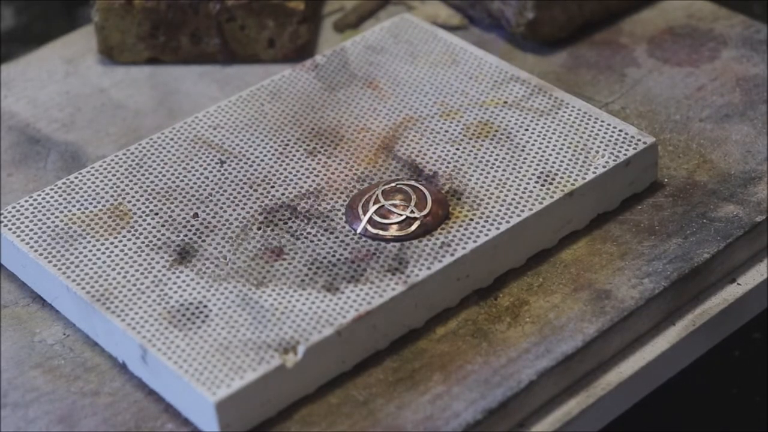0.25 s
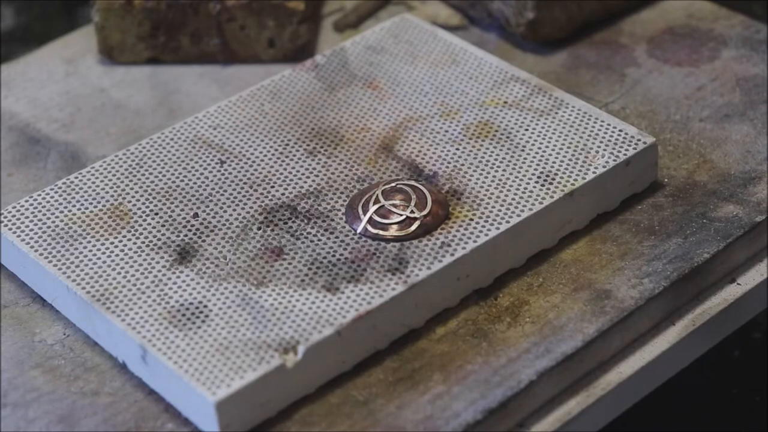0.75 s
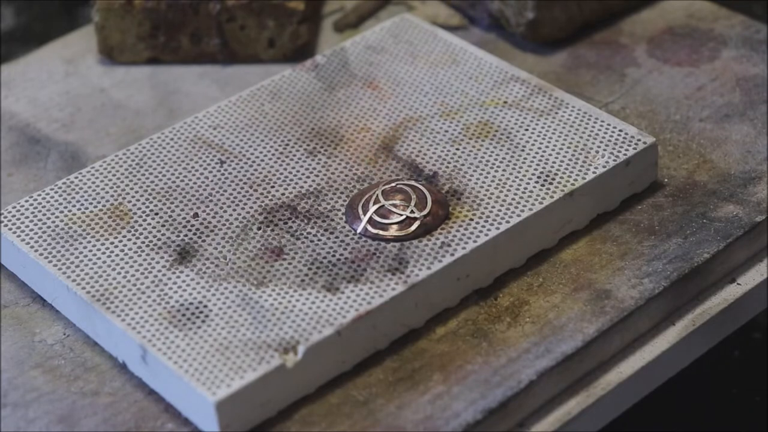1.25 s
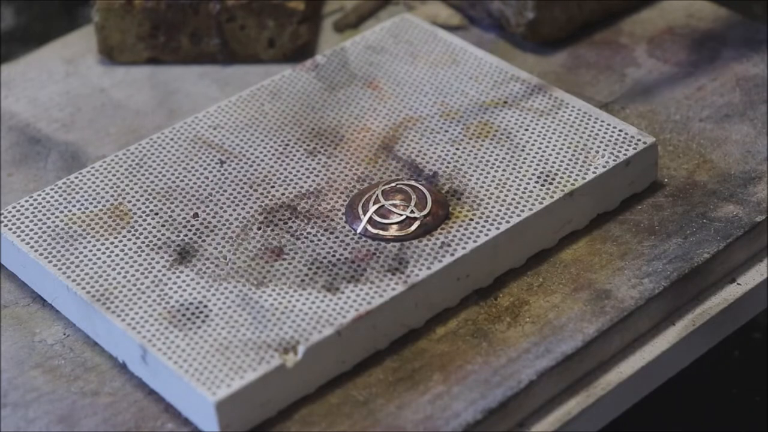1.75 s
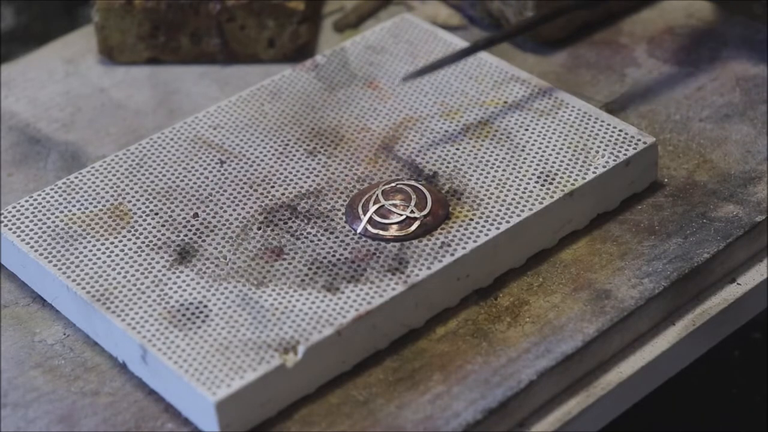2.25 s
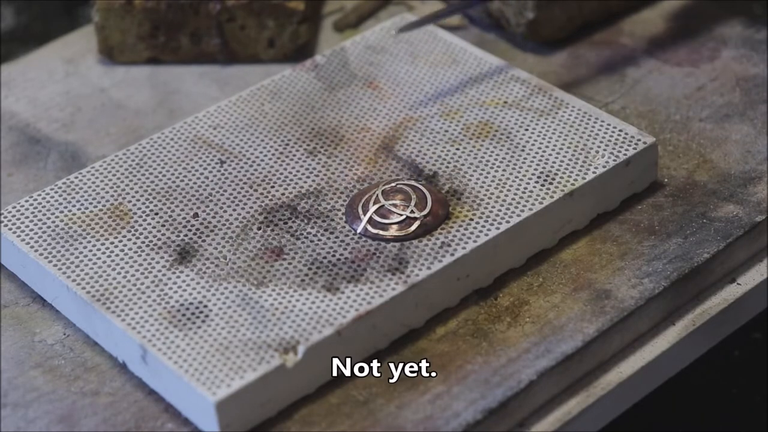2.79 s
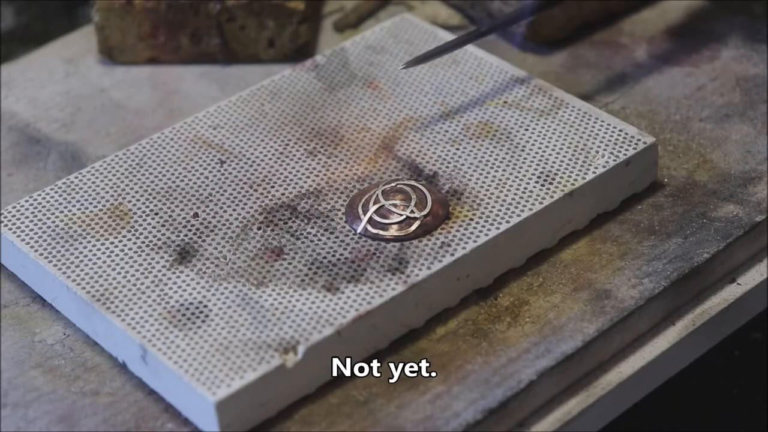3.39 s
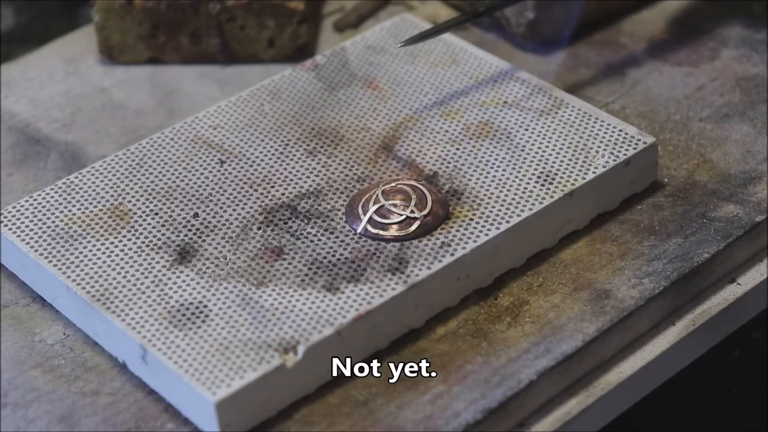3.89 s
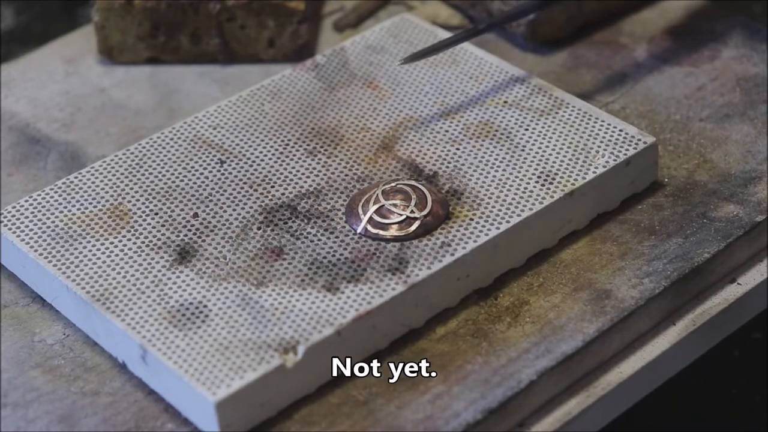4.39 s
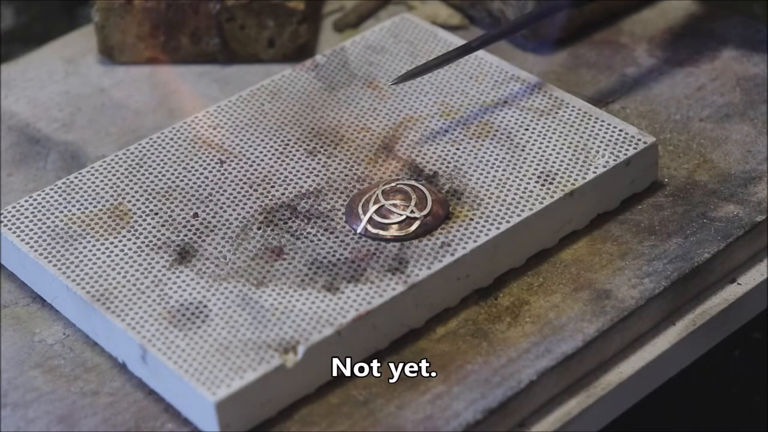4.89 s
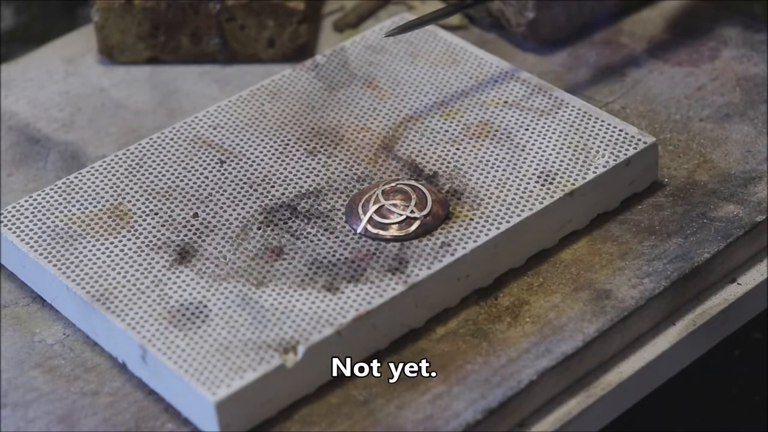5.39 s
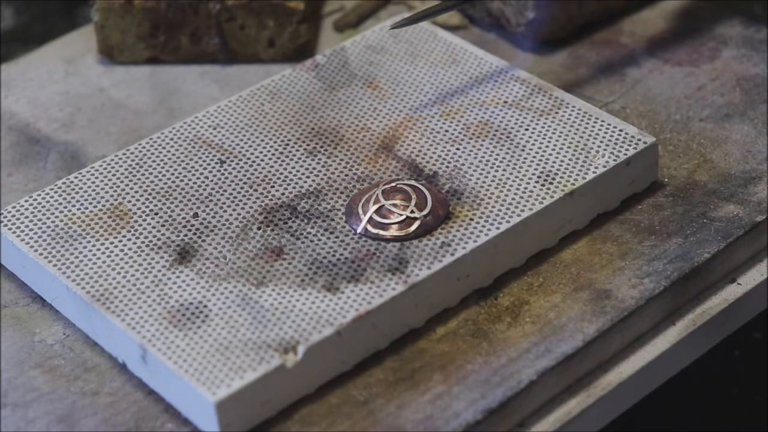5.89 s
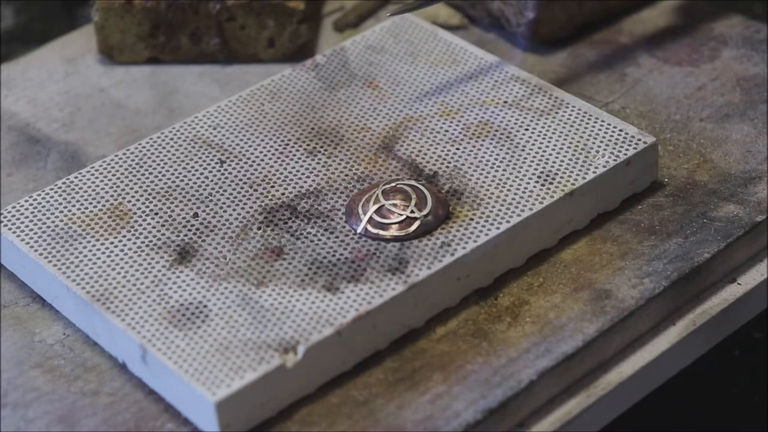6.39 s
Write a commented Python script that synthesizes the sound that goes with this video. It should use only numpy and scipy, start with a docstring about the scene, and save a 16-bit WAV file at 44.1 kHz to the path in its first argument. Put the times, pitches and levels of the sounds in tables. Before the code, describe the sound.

A small gas torch burns without pause close to a stereo microphone at a workbench. Its bright jet hiss sits in front, wavering and briefly dipping as the flame turns, over a resonant midrange roar and soft low rumble. Gentle low puffs come irregularly. Behind it an electric device buzzes steadily at mains pitch. The sound is dry and close, with no voice and no metal clinks.

```python
"""A small gas torch plays on a piece of metal on a ceramic block, close to a stereo microphone.
From the start an electric device buzzes on multiples of the mains frequency, as a sum of steady cosines;
under it noise bands make the flame's low rumble, its roar in the middle and the gas jet's hiss on top.
A soft puff comes at once, a low tone first swells after half a second, then the hiss dips and the roar wavers.
To the end the hiss dulls and brightens as the hand turns the torch, and the rumble slowly gains weight."""
import sys
import numpy as np
from scipy import signal
from scipy.fft import rfft, irfft, next_fast_len
from scipy.io import wavfile

SR = 44100
rng = np.random.default_rng(int(sys.argv[2]) if len(sys.argv) > 2 else 0)


def output_pcm(signal):
    """Save a mono or channel-first signal as 16-bit PCM at the path in sys.argv[1].

    Samples are clipped to [-1, 1] before scaling.
    """
    pcm = np.clip(np.atleast_2d(signal).T, -1, 1) * 32767
    wavfile.write(sys.argv[1], SR, np.round(pcm).astype(np.int16))


N = 293265
SIZE = next_fast_len(N)
BINS_HZ = np.maximum(np.arange(SIZE // 2 + 1) * SR / SIZE, 1)
SECONDS = np.arange(N) / SR
CONTROL_STEP = 40  # samples between points of the slow control curves
SIDES = np.array([[1], [-1]])  # left, right


def from_db(db):
    """Amplitude gain of a level in dB."""
    return 10 ** (np.asarray(db) / 20)


def in_time(rows):
    """Columns of a time table, drawn as straight lines with one value a sample."""
    start_s, *columns = np.transpose(rows)
    return [np.interp(SECONDS, start_s, column) for column in columns]


def on_bins(rows):
    """Columns of a spectrum table, joined along log frequency with one value a bin."""
    pitch_hz, *columns = np.transpose(rows)
    return [np.interp(np.log(BINS_HZ), np.log(pitch_hz), column) for column in columns]


def coloured(rows):
    """Left and right gains and likeness of a spectrum table."""
    level_db, balance_db, likeness = on_bins(rows)
    return from_db(level_db + balance_db / 2 * SIDES), likeness


def drift(rate_hz):
    """Slow random wander: sparse noise through two equal one-pole low-passes, scaled to a spread of 1."""
    pole = np.exp(-2 * np.pi * rate_hz * CONTROL_STEP / SR)
    noise = rng.standard_normal(N // CONTROL_STEP + 2002)
    slow = signal.lfilter([1], [1, -2 * pole, pole * pole], noise)[2000:]  # drop the filter's run-in
    return np.interp(np.arange(N) / CONTROL_STEP, np.arange(len(slow)), slow / slow.std())


def swells(times_s, half_s, *columns):
    """Bell-shaped level changes at the given times, each column summed into one curve."""
    points = np.arange(0, N, CONTROL_STEP)
    bells = np.exp(-((points / SR - np.c_[times_s]) / np.c_[half_s]) ** 2)
    return [np.interp(np.arange(N), points, column @ bells) for column in columns]


def turbulence(gains, likeness, low_hz, high_hz, count):
    """Coloured stereo noise, partly alike in both ears, yielded as overlapping (centre Hz, band) pairs."""
    alike = np.clip(likeness, 0, 1)
    mid, side = rfft(rng.standard_normal((2, SIZE)))
    pair = gains * (np.sqrt(1 + alike) * mid + np.sqrt(1 - alike) * side * SIDES)
    pair = pair * ((BINS_HZ > low_hz) & (BINS_HZ < high_hz))
    # the mean of left and right gets a power of 1 over all bands
    pair = pair / np.sqrt(np.mean(irfft(pair.mean(axis=0), SIZE) ** 2))
    place = np.log(BINS_HZ / low_hz) / np.log(high_hz / low_hz) * (count - 1)
    for k in range(count):
        window = np.clip(1 - abs(place - k), 0, 1)
        centre_hz = low_hz * (high_hz / low_hz) ** (k / (count - 1))
        yield centre_hz, irfft(pair * window, SIZE)[:, :N]


# partials of the buzz: mains_multiple, left_db (rms), right_db (rms)
BUZZ_PARTIALS = [(1, -57.2, -57.5), (2, -47.9, -53.2), (3, -61.9, -63.5), (4, -58.1, -58.4),
                 (5, -56.8, -62.0), (6, -53.1, -56.8), (8, -67.1, -67.9), (9, -58.2, -58.4),
                 (10, -55.0, -53.9), (11, -44.2, -41.8), (12, -48.0, -40.0), (13, -41.6, -43.9),
                 (14, -74.4, -73.7), (16, -61.6, -58.8), (17, -70.3, -52.2), (18, -57.2, -54.2),
                 (19, -40.8, -44.0), (20, -48.8, -53.9), (21, -55.7, -61.9), (22, -58.2, -61.8),
                 (23, -61.1, -63.9), (24, -60.4, -65.0), (25, -69.7, -61.9), (26, -55.2, -60.8),
                 (27, -57.9, -60.3), (28, -57.6, -62.3), (29, -71.2, -59.2), (31, -65.4, -63.5)]
# partials that push the two capsules in opposite directions: mains_multiple
OPPOSED_PARTIALS = [17, 18, 24, 28, 29]
MAINS_HZ = 50.036
BUZZ_START_S, BUZZ_RIGHT_LAG_S = -.007, .00006
BUZZ_SMEAR = .356  # radians per squared multiple: the multiples slip out of step


def buzz():
    """A smeared pulse each mains cycle, as a sum of steady multiples."""
    lag_s = np.array([[0], [BUZZ_RIGHT_LAG_S]])
    turn = 2 * np.pi * MAINS_HZ * (SECONDS - BUZZ_START_S - lag_s)
    out = 0
    for multiple, *sides_db in BUZZ_PARTIALS:
        signs = [1, -1 if multiple in OPPOSED_PARTIALS else 1]
        peaks = np.sqrt(2) * (from_db(sides_db) * signs)[:, None]
        out = out - peaks * np.cos(multiple * turn - BUZZ_SMEAR * multiple ** 2)
    return out


# swells of the low tone: centre_s, rise_db
THROBS = [(.47, 7), (1.33, 6), (1.78, 14), (2.11, 5), (2.39, 13), (3.11, 12), (3.45, 6), (3.9, 7),
          (4.13, 13), (4.3, 11.5), (4.99, 10), (5.68, 7), (5.91, 14), (6.39, 8)]
THROB_HZ, THROB_WANDER_HZ, THROB_BALANCE_DB = 149.3, 6.85, 2
THROB_DB, THROB_S, THROB_WAVER_DB = -57, 0.055, 2.5  # level between swells, swell half length, random waver


def throb():
    """A low tone of randomly wandering pitch that comes in soft puffs."""
    centre_s, rise_db = np.transpose(THROBS)
    level_db = THROB_DB + swells(centre_s, [THROB_S], rise_db)[0] + THROB_WAVER_DB * drift(3.2)
    turn = 2 * np.pi * np.cumsum(THROB_HZ + THROB_WANDER_HZ * drift(8.28)) / SR
    return np.sqrt(2) * from_db(level_db + THROB_BALANCE_DB / 2 * SIDES) * np.sin(turn)


# colour of the rumble: pitch_hz, level_db (relative, per Hz), balance_db (left over right), likeness (0-1)
RUMBLE_COLOUR = [(20, -22, -2, .95), (35, -13, 3, 0.8), (72, -3, 2, 0.6), (115, -7, -2, 0.7),
                 (184, -7.5, 0, 0.94), (218, -0.5, 2, 0.96), (327, -1, 0, 0.97), (364, -7, 2, 1),
                 (412, -4, -2, 0.8), (520, -9.5, -2, 0), (688, -11, -3, 0.55), (745, -24, 1, .4),
                 (810, -11.5, -1, .3), (1075, -12, 8, 0.64), (1225, -10.5, -1, 0.35)]
# slow level of the rumble before its trim: start_s, level_db
RUMBLE_LEVEL = [(0, -46), (1, -44), (2.2, -43.5), (3.3, -44), (4.3, -43), (5, -44), (6, -42.5),
                (6.65, -42.5)]
# soft puffs in the rumble: centre_s, rise_db
PUFFS = [(.12, 4), (1.99, 1), (3.08, 3.5), (3.88, 4.5), (4.3, 2.5), (5.42, 4.5), (6.41, 5)]
PUFF_S = 0.057  # half length of a puff


def rumble(trim_db=0.42, flicker_db=0.4):
    """Big slow eddies in the flame: low noise whose middle bands puff together and flicker on their own."""
    centre_s, rise_db = np.transpose(PUFFS)
    level_db = in_time(RUMBLE_LEVEL)[0] + swells(centre_s, [PUFF_S], rise_db)[0]
    steady_db = level_db.mean()
    change_db = level_db - steady_db
    out = 0
    for hz, band in turbulence(*coloured(RUMBLE_COLOUR), 15, 1270, count=9):
        # only the middle of the rumble follows the level curve
        moving_db = (change_db + flicker_db * drift(6.0)) * (110 < hz < 480)
        out = out + band * from_db(steady_db + trim_db + moving_db)
    return out


# resonances of bench and microphone housing that colour the roar:
# pitch_hz, width_hz (of a single pass), left_db (relative peak), right_db (relative peak)
ROAR_MODES = [(1354, 211, -19.5, -13.5), (1409, 170, -13.0, -28.5), (1510, 65, -11.5, -16.5),
              (1647, 204, -17.5, -10.0), (1732, 72, -13.0, -8.5), (1833, 143, -13.5, -13.5),
              (1915, 46, -11.0, -22.0), (1995, 146, -27.5, -9.0), (2172, 227, -5.0, -18.0),
              (2185, 139, -21.0, -2.0), (2304, 73, -3.5, -2.0), (2420, 94, -3.5, 1.0),
              (2506, 89, -3.5, 3.0), (2596, 111, -3.5, -5.5), (2693, 104, -13.0, -11.0),
              (2825, 180, -13.0, -6.5), (2926, 58, -12.5, -25.0), (2991, 58, -14.0, -15.5),
              (3115, 147, -17.0, -14.0), (3261, 132, -10.0, -12.0), (3368, 42, -13.5, -22.0),
              (3445, 87, -8.5, -3.5), (3506, 121, -8.0, -8.0), (3612, 46, -14.5, -11.0),
              (3699, 124, -8.0, -8.5), (3851, 185, -13.5, -11.0), (3947, 133, -15.0, -19.5),
              (4141, 171, -25.5, -26.0)]
# how alike the roar is in both ears: pitch_hz, likeness (0-1)
ROAR_LIKENESS = [(1250, 0), (1400, 0.7), (1550, 0.1), (1750, 0.96), (1980, 0.08), (2150, 0.91),
                 (2500, 0.91), (2750, 0.74), (2950, 0.53), (3130, 0), (3260, 0.97), (3550, 0.65),
                 (3700, 0.84), (4100, 0.38)]
# small chance rises and falls in the roar's level: centre_s, change_db
ROAR_CHANGES = [(.81, -2), (1.03, -1.5), (1.23, 1.8), (1.52, 2), (1.99, 1.7), (2.08, -1), (2.42, 0.5),
                (2.56, -0.8), (2.71, 1.8), (2.86, -1), (3.44, 1), (3.53, -1.5), (3.89, 1.5), (4.38, 1.5),
                (5.15, 1), (5.73, 1), (5.82, -1.8), (6.3, -2.5), (6.48, 1)]
ROAR_DB, ROAR_CHANGE_S = -29.5, 0.046  # level between the changes, half length of a change
ROAR_WAVER_DB, ROAR_WAVER_HZ = .3, 6.4  # random waver of the whole roar


def roar(flicker_db=1.0):
    """Burning noise through many resonances, each applied twice so that the valleys stay dark."""
    centre_s, change_db = np.transpose(ROAR_CHANGES)
    chance_db = swells(centre_s, [ROAR_CHANGE_S], change_db)[0]
    level_db = ROAR_DB + chance_db + ROAR_WAVER_DB * drift(ROAR_WAVER_HZ)
    power = 0
    for hz, width_hz, *sides_db in ROAR_MODES:
        resonance = 1 / (1 + (2 * (BINS_HZ - hz) / width_hz) ** 2)
        power = power + from_db(sides_db)[:, None] ** 2 * resonance ** 2
    bands = turbulence(np.sqrt(power), on_bins(ROAR_LIKENESS)[0], 1270, 4600, count=7)
    return from_db(level_db) * sum(band * from_db(flicker_db * drift(4.6)) for _, band in bands)


# the jet as the torch turns: start_s, top_level_db (its swings as at TOP_HZ), lower_level_db
JET = [(0, -33.5, -37.5), (.4, -35, -37), (.8, -34, -37), (1.2, -35.5, -39.5), (1.6, -34.5, -39),
       (1.88, -31.5, -36), (2.1, -36, -39), (2.5, -31.5, -39), (2.7, -35.5, -37.5), (3.3, -30.5, -38),
       (3.5, -36.5, -39), (3.85, -34, -38), (4.15, -35.5, -38.5), (4.45, -33, -36), (4.8, -35.5, -40.5),
       (4.97, -33.5, -38), (5.5, -34, -40.5), (5.95, -35.5, -38), (6.5, -36, -39), (6.65, -36, -39)]
# brief dips of the hiss, a negative drop being a lift: centre_s, half_length_s, top_drop_db, lower_drop_db
DIPS = [(0.705, .04, 11, 1.5), (.92, 0.034, 5, 4), (1.38, 0.035, 1, 1), (2.39, .04, 4, -2),
        (3.24, .03, 5, 2), (3.477, .03, 1, 3.5), (4.0, .05, 4, 5), (4.21, .05, 3, 1.5), (5.27, .04, 3.5, 0),
        (5.754, 0.076, 7, 1.5), (6.17, .04, 7, 1), (6.317, .04, 6.5, 0.5)]
JET_WAVER_DB, JET_WAVER_HZ = 1.0, 5  # random waver of the top, before the shading by band


def jet_levels():
    """Level curves of the jet's top and lower hiss: the turning torch, brief dips and a waver on top."""
    top_db, lower_db = np.subtract(in_time(JET), swells(*np.transpose(DIPS)))
    return top_db + JET_WAVER_DB * drift(JET_WAVER_HZ), lower_db


# colour of the lower hiss: pitch_hz, level_db (relative, per Hz), balance_db (left over right), likeness (0-1)
HISS_COLOUR = [(4300, -38, 2.0, 0.6), (4530, -71, 0.0, 0.8), (4854, -23, 1, 0.5), (5244, -17, -1.5, 0.83),
               (5590, -38, 2, 0.8), (6085, -18, -0.5, 0.62), (6420, -2, 1, 0.7), (7100, 1, -4, 0.57),
               (7910, -12.5, 1, 0.74), (8390, 1.5, -2.5, 0.7), (8620, -11, -3, 0.4), (9450, -15.5, 1, 0.96),
               (10330, -3.5, -3, 0.57), (10980, -16, 5, 0.7), (11460, -35, -0.5, 0)]


def hiss(lower_db, own_db=1.56):
    """The lower hiss of the jet: noise in bands that each waver a little on their own."""
    bands = turbulence(*coloured(HISS_COLOUR), HISS_COLOUR[0][0], HISS_COLOUR[-1][0], count=7)
    return from_db(lower_db) * sum(band * from_db(own_db * drift(12.4)) for _, band in bands)


# colour of the top hiss: pitch_hz, level_db (relative, per Hz), balance_db (left over right), likeness (0-1)
TOP_COLOUR = [(11400, -43.0, 1, 0), (11780, -39, 0.0, 0.66), (11760, -16.5, -1.5, 0.6),
              (12300, -24.5, 1, 0.46), (12660, -19.0, -5, 0.16), (13140, -6.5, -5, 0.6),
              (13630, -5.5, -2.5, 0.56), (14000, 0.5, -6.5, 0.67), (14400, -14, -4.5, 0.52),
              (14950, -17, -2.5, 0.4), (15420, -13, -3.5, 0.61), (15600, -21, 1, 0.51)]
TOP_HZ, SHADE_SLOPE = 14000, 2.0  # a band follows the jet's dB change times (Hz / TOP_HZ) ** slope


def hiss_top(top_db, own_db=0.8, flutter_db=1.0):
    """The jet beams its treble: the higher the band, the more it follows the turning of the torch."""
    steady_db = top_db.mean()
    flutter = flutter_db * drift(30.0)  # shared by all bands
    out = 0
    for hz, band in turbulence(*coloured(TOP_COLOUR), TOP_COLOUR[0][0], 17000, count=5):
        shade_db = (top_db - steady_db) * (hz / TOP_HZ) ** SHADE_SLOPE
        out = out + band * from_db(steady_db + shade_db + own_db * drift(11.0) + flutter)
    return out


def scene():
    """Buzz behind, then the flame's low tone, rumble and roar, with the jet in front."""
    top_db, lower_db = jet_levels()
    flame = throb() + rumble() + roar()
    jet = hiss(lower_db) + hiss_top(top_db)
    return buzz() + flame + jet


def record(dry):
    """A steep elliptic low-pass cuts the top above 15720 Hz."""
    low_pass = signal.ellip(14, .1, 70, 15720, fs=SR, output="sos")  # order, ripple dB, stop-band dB, edge Hz
    return signal.sosfilt(low_pass, dry)


dry = scene()
out = record(dry)
output_pcm(out)
```